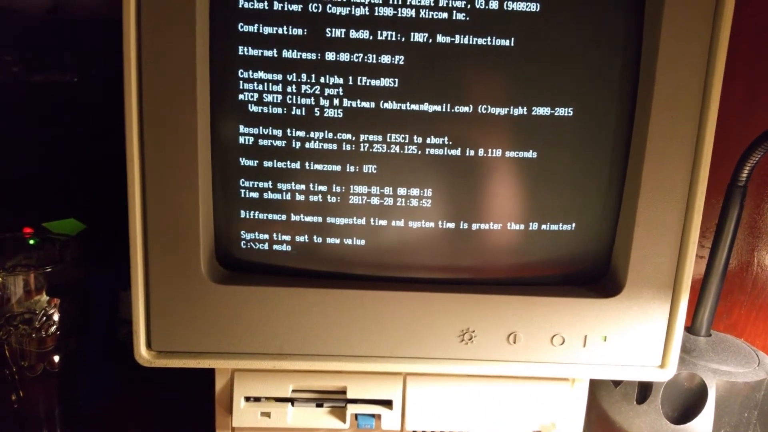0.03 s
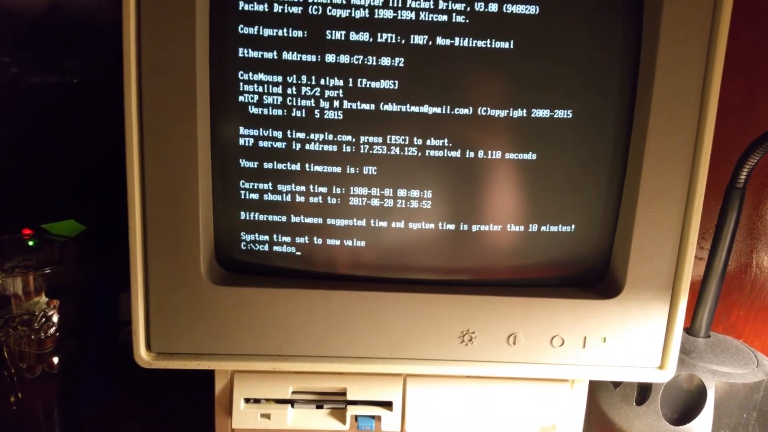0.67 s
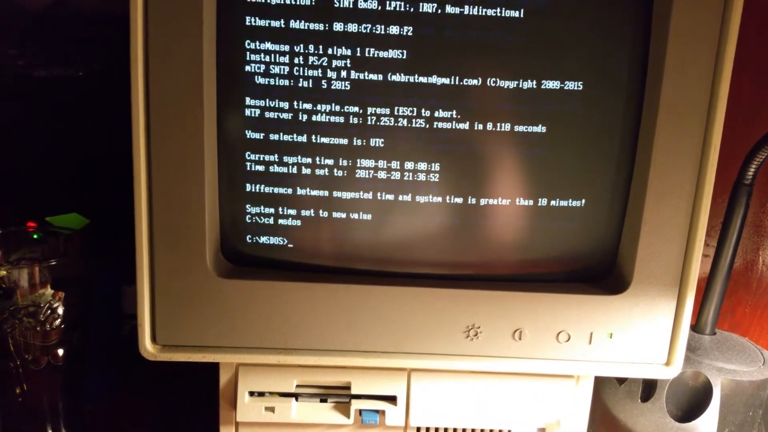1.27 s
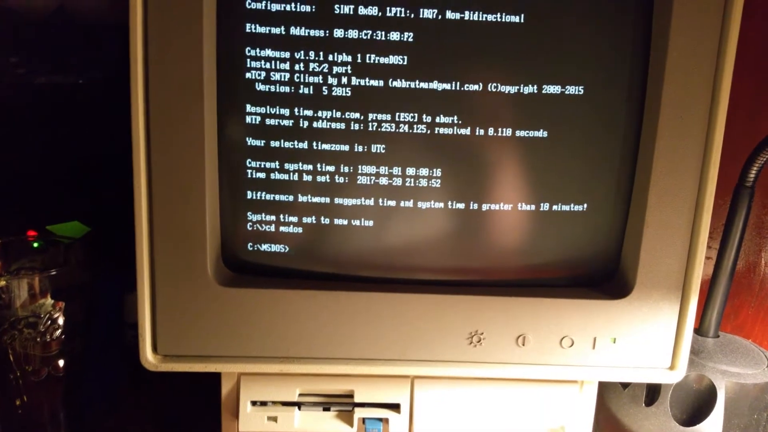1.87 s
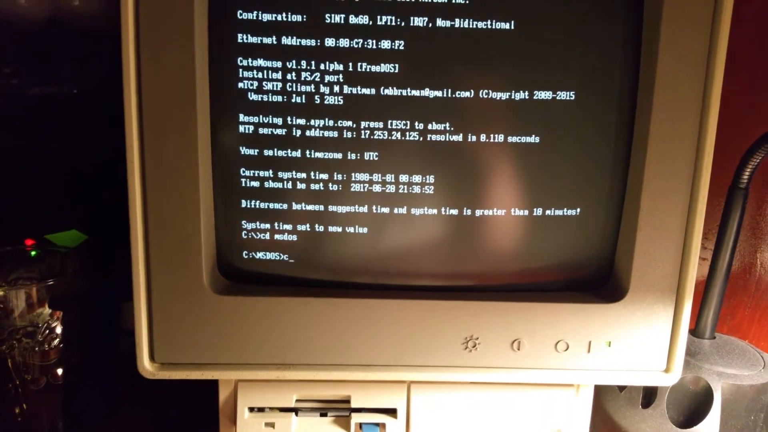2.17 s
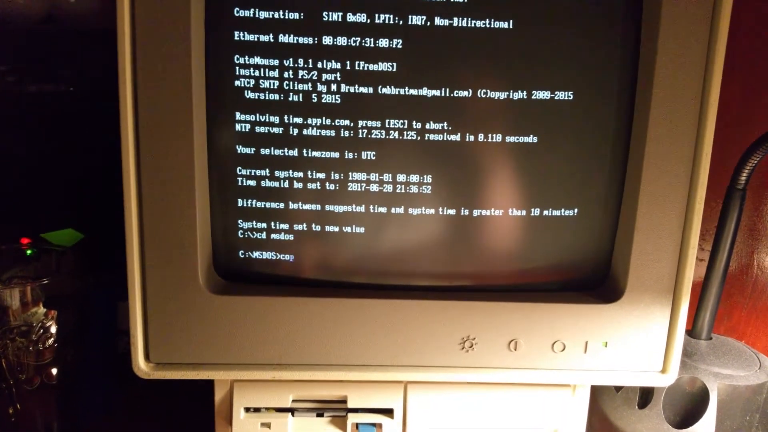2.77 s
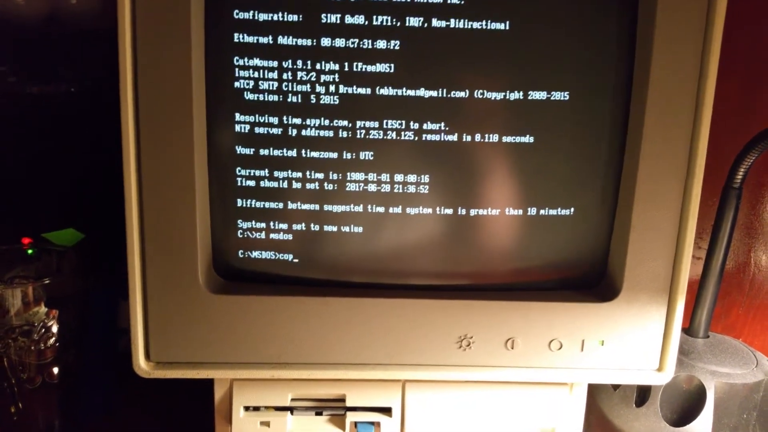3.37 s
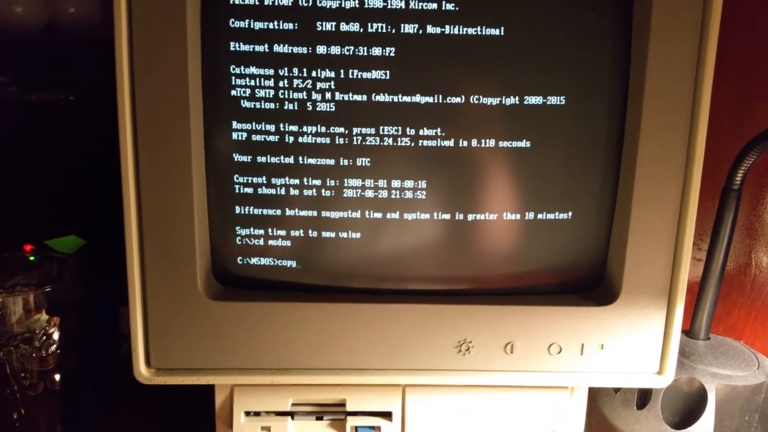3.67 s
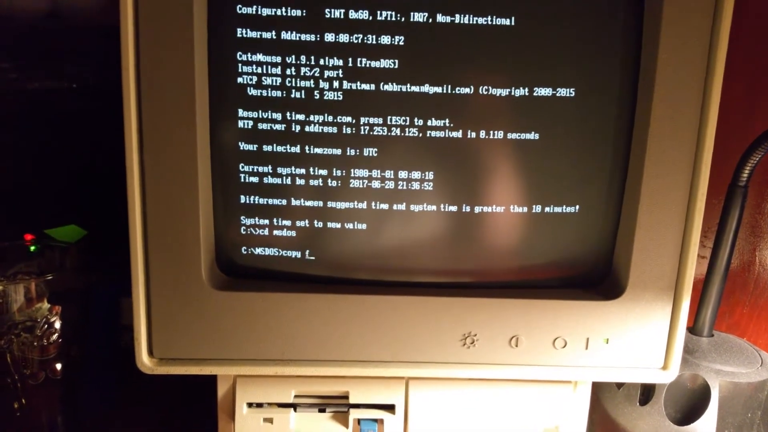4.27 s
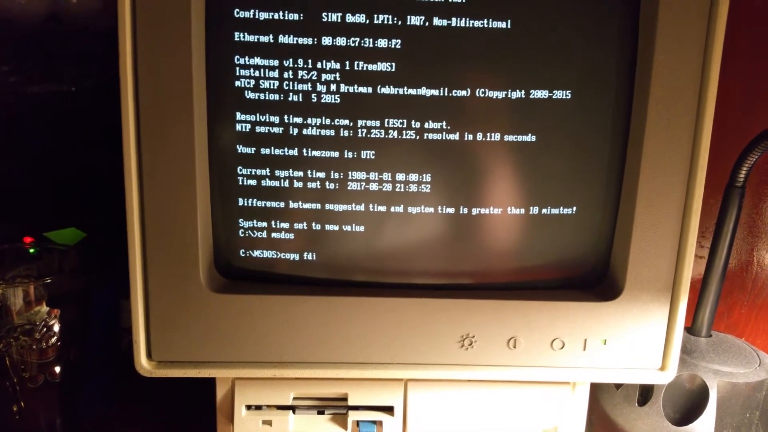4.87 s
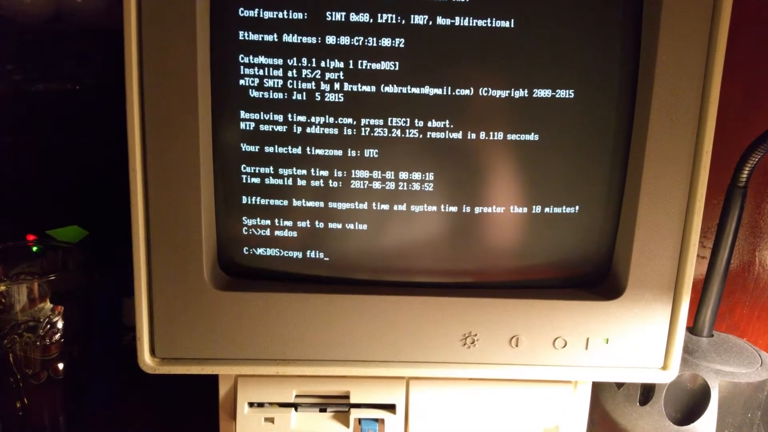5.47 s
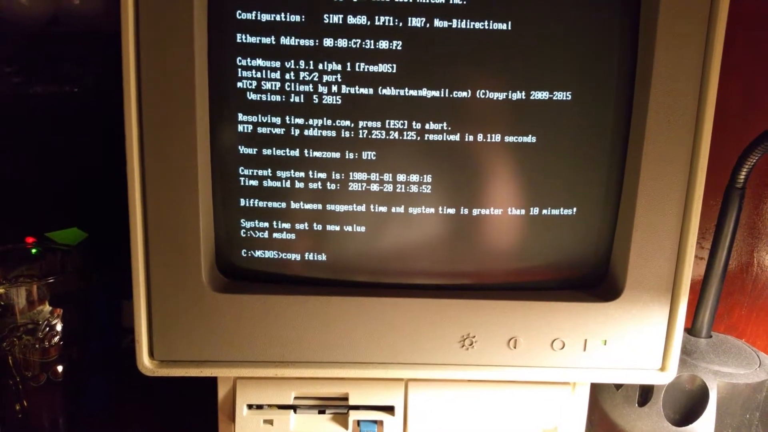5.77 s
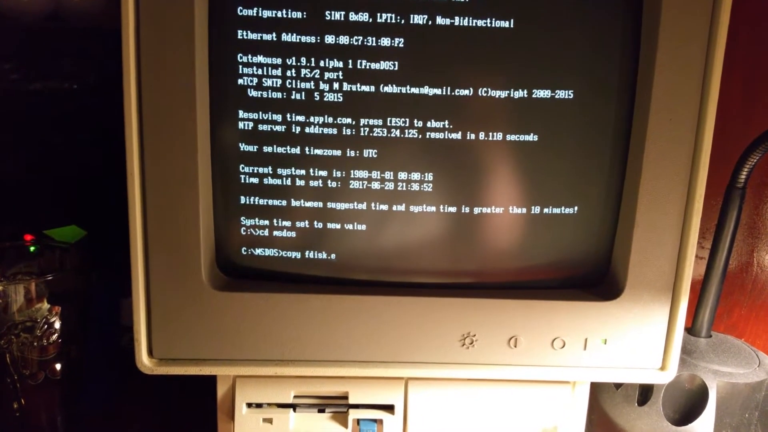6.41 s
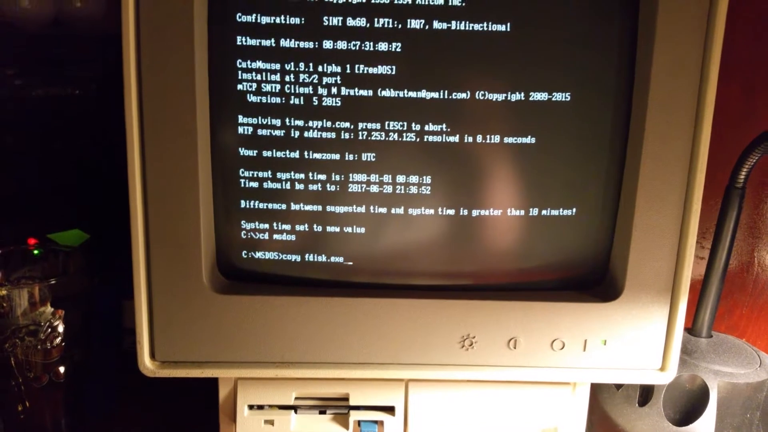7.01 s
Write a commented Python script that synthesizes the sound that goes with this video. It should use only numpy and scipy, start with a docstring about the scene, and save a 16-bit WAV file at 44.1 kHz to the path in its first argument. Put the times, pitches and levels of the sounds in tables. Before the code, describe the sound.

Slow typing on an old clicky keyboard, each key snapping down and clacking back up, over a steady computer fan hum.

```python
"""A small quiet room, where a short command is typed, key by key, on an old clicky keyboard.
Each key ticks, snaps down onto its plate and shakes the desk, then clacks back up with a spring ping.
The computer's fans and disk hum throughout, with a faint, very high monitor whine.
A hand-held phone with two microphone ports listens close by."""
import sys
import numpy as np
from scipy import signal
from scipy.fft import rfft, irfft
from scipy.io import wavfile

SR = 44100
rng = np.random.default_rng(int(sys.argv[2]) if len(sys.argv) > 2 else 0)


def store_pcm(level_fs):
    """Save levels as 16-bit WAV."""
    pcm = np.round(np.clip(level_fs, -1, 1) * 32767).astype(np.int16)
    wavfile.write(sys.argv[1], SR, np.atleast_2d(pcm).T)


N = 319725

# The typing, one keystroke a row: down_s, down_level_db, up_s, up_level_db, thump_db,
# knock_hz, cap_hz, clack_db, crack_db, spring_hz, ping_db
KEYSTROKES = [(0.3519, -15.5, 0.4253, -25, -38, 1300, 1760, 0, -2.5, 7000, 17.5),
              (0.9808, -9.5, 1.0558, -21.5, -40.5, 760, 5720, -4, 5, 7100, 1.5),
              (2.0509, -18, 2.1233, -28, -36, 1300, 2420, 1.5, 3.5, 7120, 15),
              (2.6341, -15.5, 2.7087, -25, -38, 1230, 2450, -0.5, 0.5, 7900, 14),
              (2.7939, -18, 2.8664, -22, -40, 665, 1880, 2.5, 2, 7620, 14.5),
              (3.4631, -12.5, 3.5469, -26.5, -34, 1220, 2440, 2.5, 0.5, 7250, 7.5),
              (3.775, -25.5, 3.8669, -28, -44, 1230, 3760, -9, 1, 7200, -2),
              (4.2927, -17, 4.3814, -27, -37, 1130, 2440, 1.5, 2.5, 7440, 5),
              (4.5351, -20.5, 4.6262, -29, -36, 800, 2460, 0.5, 3, 6870, 10.5),
              (4.8707, -16, 4.9472, -25, -44, 1210, 4400, 4.5, -3, 6680, 13),
              (5.3297, -19.5, 5.4117, -25, -38.5, 1380, 2200, 2, 0.5, 6740, 11),
              (5.7607, -25, 5.8412, -28, -49.5, 1030, 2350, 0, -0.5, 6500, 8.5),
              (5.9927, -20, 6.076, -29, -42.5, 1430, 1810, -0.5, 1.5, 7870, 14.5),
              (6.4304, -28, 6.518, -26.5, -51, 1130, 2270, -0.5, -3, 7480, 10),
              (6.6613, -29, 6.7454, -25.5, -47, 1350, 2530, 1, -2, 6700, 9),
              (6.85, -22, 6.9347, -26.5, -42, 950, 2180, -1.5, -0.5, 7240, 2.5),
              (7.0312, -26, 7.121, -26.5, -39, 770, 3860, -2.5, 1, 6900, 0)]
# A finger only brushes a cap: start_s, level_db, knock_hz, knock_db, clack_db
BRUSHES = [(0.7603, -43, 720, -8, -12), (0.8757, -43, 670, 20, -1), (3.827, -46, 1200, 3, 4)]
# Tone of a key going down: frequency_hz, gain_db
PRESS_EQ = [(130, -25), (300, -10.5), (520, -14), (700, -2.5), (1000, -5), (1250, 2.5), (1550, 0),
            (2000, 4), (2450, -1), (3300, -9.5), (4500, -3), (6000, -11), (7500, -13), (9500, -18.5),
            (15000, -29)]
# Tone of a key coming up: frequency_hz, gain_db
RELEASE_EQ = [(130, -9.5), (300, -5.5), (520, -10), (700, 0.5), (1000, -2.5), (1250, 4), (1550, -0.5),
              (2000, 3.5), (2450, 3), (3300, -8.5), (4500, -4), (6000, -11), (7500, -13), (9500, -23.5),
              (15000, -30.5)]
# The cap's clack and the contact's crack, bands that vary from key to key: centre_hz, width_octaves
CLACK_CRACK_BANDS = [(2100, 0.47), (12500, 0.57)]
# Longer rings of the keyboard case: pitch_hz, level_db, t60_s
CASE_RINGS = [(661.4, -31.5, 0.16), (815, -21.5, 0.082), (1319, -15, 0.042), (2110, -28, 0.036),
              (2516, -25.5, 0.094)]
# Low boom of the desk under the keyboard: pitch_hz, level_db, t60_s
DESK_RINGS = [(59.5, 8.5, 0.26), (73.5, 1, 0.18), (98.4, 2.5, 0.27)]
# Tone of the fans' rush: frequency_hz, gain_db
FAN_EQ = [(22, 1.5), (90, -3), (165, -15.5), (220, -8), (320, -4.5), (410, -13), (560, -10.5), (950, -15),
          (2400, -13.5), (3700, -17.5), (4900, -16), (6500, -27), (9800, -36), (15000, -41)]
# Resonances of the computer's housing: centre_hz, width_hz, gain_db
HOUSING_PEAKS = [(206.3, 53, 8), (346, 64, 6.5), (475, 68, 12), (653, 38, 4), (796, 140, 7.5),
                 (1206, 125, 5.5), (2450, 270, 1), (8600, 300, 4.5), (10100, 300, 0.5)]
# Hum tones of the computer, plus a faint, very high monitor whine: pitch_hz, level_db, wander_share
HUM_TONES = [(46.4, -52, 0.013), (92.5, -59, 0.0067), (119.3, -63, 0.0011), (243.3, -59, 0.0034),
             (312.4, -60.5, 0.02014), (376, -65, .003), (493.5, -56, 0.00601), (740, -62.5, 0.0028),
             (1700, -71, 0.00346), (15735, -90, .00001)]
# Microphone port resonances, left then right: centre_hz, width_hz, gain_db
PORT_PEAKS = [(5467, 1940, 14), (7150, 2660, 13)]

GRAIN = 2 ** 14   # samples in one hit and its tail
AGE_S = np.arange(GRAIN) / SR
GRAIN_HZ = np.maximum(np.fft.rfftfreq(GRAIN, 1 / SR), 1)
KNOCK_WIDTH_HZ, CAP_WIDTH_HZ, SPRING_WIDTH_HZ = 380, 440, 680   # plate, cap and spring are well damped


def key_presses(plate, firm_db=-18, firm_travel_s=0.004, travel_halves_db=7, tick_db=-31.5):
    """The switch ticks at a steady level, then the key hits its stop: sooner under a firmer finger."""
    hits = []
    for down_s, level_db, *_, knock_hz, cap_hz, clack_db, crack_db, spring_hz, ping_db in KEYSTROKES:
        travel_s = firm_travel_s * 2 ** ((firm_db - level_db) / travel_halves_db)
        peaks = [(knock_hz, KNOCK_WIDTH_HZ, 4.5), (cap_hz, CAP_WIDTH_HZ, 6.5),
                 (spring_hz, SPRING_WIDTH_HZ, 0.52 * ping_db)]   # a squeezed spring rings less
        hits.append((down_s, level_db, [(travel_s, tick_db)], clack_db, crack_db, peaks))
    return key_hits(hits, PRESS_EQ, plate, snap_db=6.5, snap_hz=1580, swell_t60=0.0043, tick_t60=0.45)


def key_releases(plate, ease_s=0.021, ease_db=-51.5, return_s=0.004, tick_db=-40):
    """The stem shifts as the finger eases off, the switch ticks, the cap clacks up and the spring pings."""
    hits = []
    ticks = [(ease_s, ease_db), (return_s, tick_db)]   # the spring lifts every key at the same speed
    for _, _, up_s, level_db, _, knock_hz, cap_hz, clack_db, crack_db, spring_hz, ping_db in KEYSTROKES:
        # coming up, the cap clacks a little lower and more evenly
        peaks = [(knock_hz, KNOCK_WIDTH_HZ, 2), (0.945 * cap_hz, CAP_WIDTH_HZ, 6),
                 (spring_hz, SPRING_WIDTH_HZ, ping_db)]
        hits.append((up_s, level_db, ticks, 0.33 * clack_db, crack_db + 4.5, peaks))
    return key_hits(hits, RELEASE_EQ, plate, snap_db=1, snap_hz=3120, swell_t60=0.0038, tick_t60=0.16)


def cap_brushes(plate):
    """A brushed cap rattles faintly; its switch does not trip."""
    hits = [(start_s, level_db, [], clack_db, 0, [(knock_hz, KNOCK_WIDTH_HZ, knock_db)])
            for start_s, level_db, knock_hz, knock_db, clack_db in BRUSHES]
    return key_hits(hits, PRESS_EQ, plate, snap_db=6.5, snap_hz=1570, swell_t60=0.0035)


def key_hits(hits, eq, plate, snap_db, snap_hz, swell_t60, tick_t60=1, tick_snap_db=-3):
    """Each hit has its own tone and stereo spot, with any light ticks placed just ahead of it."""
    out = np.zeros((2, N))
    for start_s, level_db, ticks, clack_db, crack_db, peaks in hits:
        tone_db = eq_curve(eq, GRAIN_HZ) + sum(peak_db(*peak) for peak in peaks)
        for (centre_hz, octaves), band_db in zip(CLACK_CRACK_BANDS, (clack_db, crack_db)):
            tone_db += band_db * np.exp(-(np.log2(GRAIN_HZ / centre_hz) / octaves) ** 2 / 2)
        lag_s = 0.0003233 * rng.normal(1, 0.13)   # the keyboard lies left, each key at its own angle
        pan_db = rng.normal(-1, 0.6)   # left minus right
        hit = plastic_contact(plate, tone_db, pan_db, lag_s, snap_db, snap_hz, swell_t60)
        add(out, from_db(level_db) * hit, start_s)
        # a tick moves little mass, so it is thinner and shorter
        thin_db = tone_db + 2.5 * np.log2(np.clip(GRAIN_HZ, 400, 8000))
        for early_s, tick_db in ticks:
            tick = plastic_contact(plate, thin_db, pan_db, lag_s, tick_snap_db, snap_hz, swell_t60)
            add(out, from_db(tick_db) * tick * decay(tick_t60), start_s - early_s)
    return out


def plastic_contact(plate, tone_db, pan_db, lag_s, snap_db, snap_hz, swell_t60):
    """A bright snap, the dense ring of cap and plate, then echoes; rms 1 over the first 12 ms."""
    dense_modes = (plate + rng.standard_normal(GRAIN)) / np.sqrt(2)   # half shared, half its own
    burst = rng.standard_normal(GRAIN) * decay(0.012)
    snap = signal.lfilter(*signal.butter(2, snap_hz, "high", fs=SR), burst)
    body = dense_modes * decay(0.047)
    for pitch_hz, level_db, t60_s in CASE_RINGS:   # each key excites the case at another spot
        gain = from_db(level_db + rng.normal(0, 1.6)) * rng.choice([-1, 1])
        body += gain * ring(pitch_hz, t60_s)
    swell = 1 - decay(swell_t60)   # the blow needs a few ms to spread through the case
    direct = at_ports(from_db(snap_db) * snap + swell * body, lag_s)
    desk_echo = from_db(-7) * decay(0.074)
    room_tail = from_db(-23) * decay(0.25)
    echoes = swell * (desk_echo + room_tail) * diffuse_noise(GRAIN, apart_hz=870)
    sound = apply_eq(direct + echoes, tone_db) * from_db([[pan_db / 2], [-pan_db / 2]])
    return sound / rms(sound[:, :int(0.012 * SR)])


def desk_thumps(delay_s=0.0044, rise_t60=0.038, lift_db=-52):
    """The finger's weight lands softly after the snap and rocks the desk; lifting off rocks it a little."""
    out = np.zeros((2, N))
    pushes = []
    for down_s, _, up_s, _, thump_db, *_ in KEYSTROKES:
        pushes += [(down_s, from_db(thump_db)), (up_s, -from_db(lift_db))]
    for start_s, push in pushes:
        thump = 0
        for pitch_hz, level_db, t60_s in DESK_RINGS:   # each key's place favours other modes
            thump += from_db(level_db + rng.normal(0, 3)) * ring(pitch_hz, t60_s)
        add(out, push * thump * (1 - decay(rise_t60)), start_s + delay_s)
    return out


def fan_rush(level_db=-47.5, right_lift_db=3, shelf_hz=1500):
    """Air rushes through the computer's resonant housing, brighter on the right."""
    hz = np.maximum(np.fft.rfftfreq(N, 1 / SR), 1)
    tone_db = eq_curve(FAN_EQ, hz) + sum(peak_db(*peak, hz=hz) for peak in HOUSING_PEAKS)
    lean_db = right_lift_db / 2 * hz ** 2 / (hz ** 2 + shelf_hz ** 2) * np.array([[-1], [1]])
    air = diffuse_noise(N, apart_hz=606)
    rush = irfft(rfft(air) * from_db(tone_db + lean_db), N)
    return from_db(level_db) * rush / rms(rush)


def computer_hum(waver_db=3):
    """A bed of wavering hum tones from the computer, plus a faint, very high monitor whine."""
    hum = np.zeros(N)
    for pitch_hz, level_db, wander_share in HUM_TONES:
        wandering_hz = pitch_hz * (1 + wander_share * drift(rate_hz=8.2))
        turns = np.cumsum(wandering_hz) / SR + rng.random()
        gain = from_db(level_db + waver_db * drift(rate_hz=8))
        hum += gain * np.sqrt(2) * np.sin(2 * np.pi * turns)
    return hum


def diffuse_noise(size, apart_hz):
    """White noise from all sides: alike at both ports in the bass, unrelated in the treble."""
    hz = np.fft.rfftfreq(size, 1 / SR)
    alike = 0.85 / (1 + (hz / apart_hz) ** 4)
    mid, side = rfft(rng.standard_normal((2, size)))
    return irfft(np.sqrt(1 + alike) * mid + np.sqrt(1 - alike) * side * [[1], [-1]], size) / np.sqrt(2)


def at_ports(x, lag_s, alike_hz=800):
    """A near sound reaches the right port later; the bass is heard alike in both."""
    delay_s = lag_s / (1 + (alike_hz / GRAIN_HZ) ** 4)
    right = irfft(rfft(x) * np.exp(-2j * np.pi * GRAIN_HZ * delay_s))
    return np.array([x, right])


def port_resonance(x, centre_hz, width_hz, gain_db):
    """The air in a microphone port resonates, like a bell EQ."""
    height = from_db(gain_db / 2)
    angle = 2 * np.pi * centre_hz / SR
    damp = np.sin(angle) * width_hz / centre_hz / 2
    return signal.lfilter([1 + damp * height, -2 * np.cos(angle), 1 - damp * height],
                          [1 + damp / height, -2 * np.cos(angle), 1 - damp / height], x)


def apply_eq(x, tone_db):
    """Minimum-phase EQ on a grain, so nothing rings ahead of the attack."""
    cepstrum = irfft(np.log(from_db(tone_db)))
    cepstrum[1:GRAIN // 2] *= 2
    cepstrum[GRAIN // 2 + 1:] = 0
    return irfft(rfft(x) * np.exp(rfft(cepstrum)))


def eq_curve(points, hz):
    """Gain in dB between EQ points, on a log-frequency axis."""
    point_hz, gain_db = np.transpose(points)
    return np.interp(np.log(hz), np.log(point_hz), gain_db)


def peak_db(centre_hz, width_hz, gain_db, hz=GRAIN_HZ):
    """A resonance as a bell curve in dB."""
    return gain_db / (1 + (2 * (hz - centre_hz) / width_hz) ** 2)


def ring(pitch_hz, t60_s):
    """One struck mode: a dying sine."""
    return np.sin(2 * np.pi * pitch_hz * AGE_S) * decay(t60_s)


def decay(t60_s):
    """A grain-long envelope that falls 60 dB in t60_s."""
    return np.exp(-np.log(1000) * AGE_S / t60_s)


def drift(rate_hz):
    """Slow wander between random points of spread 1."""
    knots = rng.standard_normal(int(rate_hz * N / SR) + 2)
    return np.interp(np.arange(N) * rate_hz / SR, np.arange(len(knots)), knots)


def add(out, grain, start_s):
    """Mix a grain in at its cue."""
    start = int(round(start_s * SR))
    part = out[:, start:start + GRAIN]
    part += grain[..., :part.shape[1]]


def from_db(db):
    """Decibels to gain."""
    return 10 ** (np.asarray(db) / 20)


def rms(x):
    """Root mean square."""
    return np.sqrt(np.mean(x ** 2) + 1e-20)


def scene():
    """Keys up front, the desk beneath them, the computer behind."""
    plate = rng.standard_normal(GRAIN)   # the dense modes that all keys share
    keys = key_presses(plate) + key_releases(plate) + cap_brushes(plate)
    return keys + desk_thumps() + fan_rush() + computer_hum()


def record(dry):
    """Each port adds its colour, the hardest key overloads, and the top is cut at 16 kHz."""
    heard = np.array([port_resonance(channel, *peak) for channel, peak in zip(dry, PORT_PEAKS)])
    high_cut = signal.ellip(10, 0.1, 80, 16000, fs=SR, output="sos")
    return signal.sosfilt(high_cut, np.clip(heard, -1, 1))


dry = scene()
out = record(dry)
store_pcm(out)
```